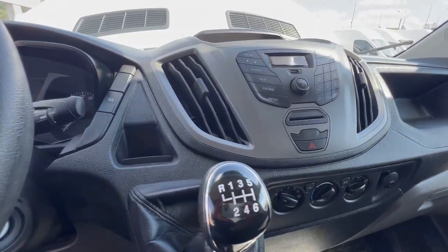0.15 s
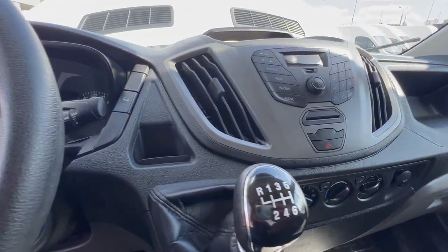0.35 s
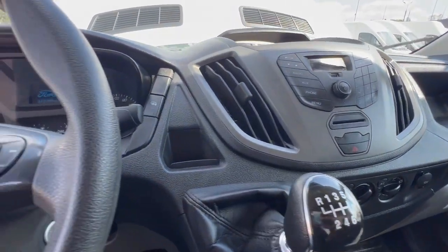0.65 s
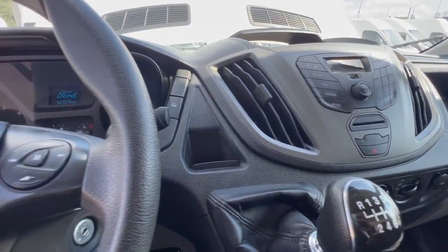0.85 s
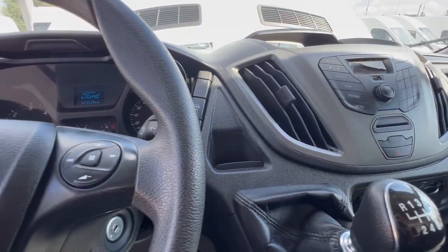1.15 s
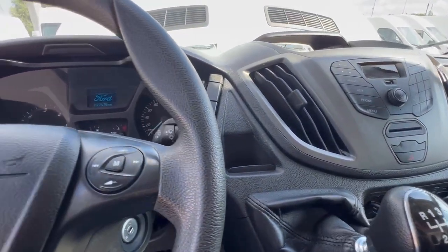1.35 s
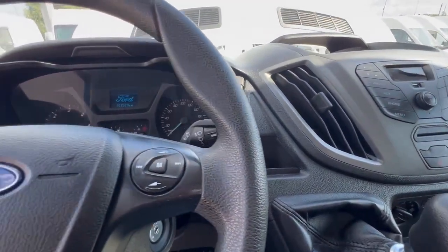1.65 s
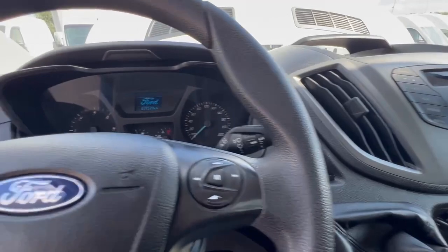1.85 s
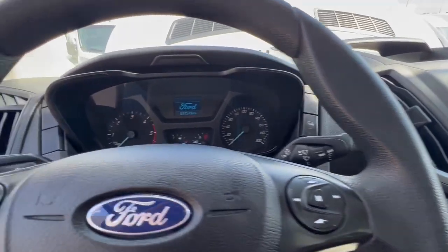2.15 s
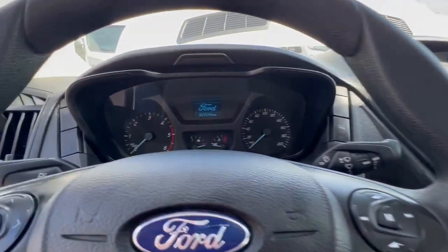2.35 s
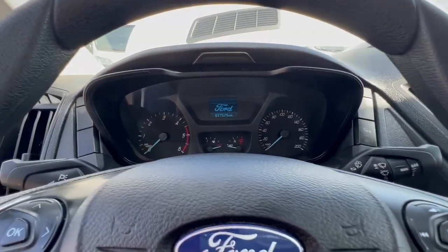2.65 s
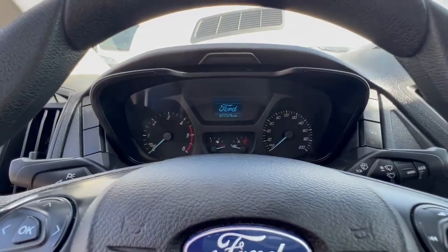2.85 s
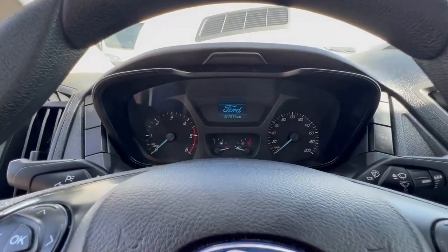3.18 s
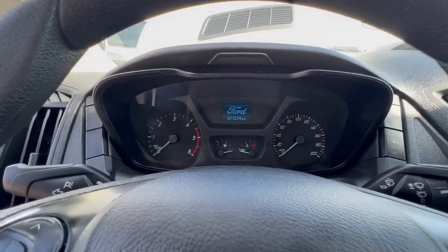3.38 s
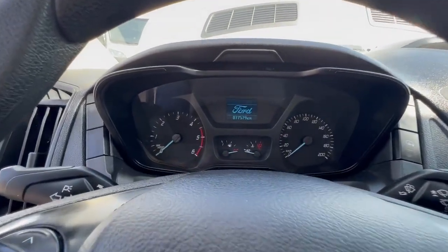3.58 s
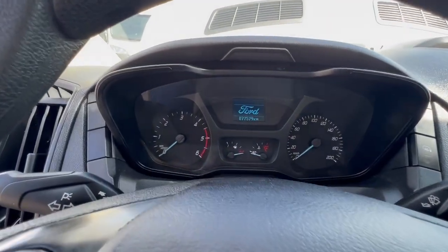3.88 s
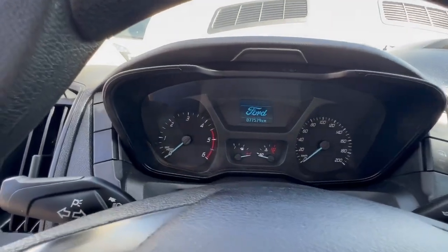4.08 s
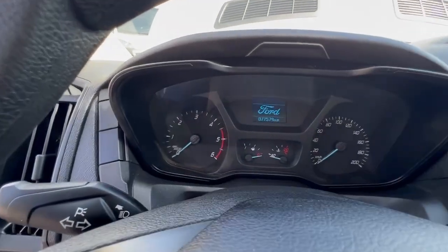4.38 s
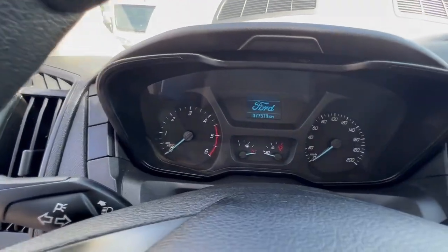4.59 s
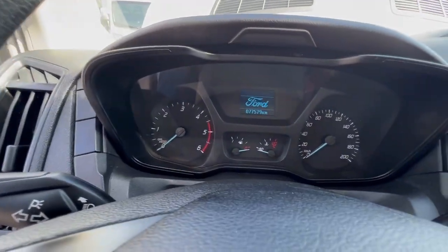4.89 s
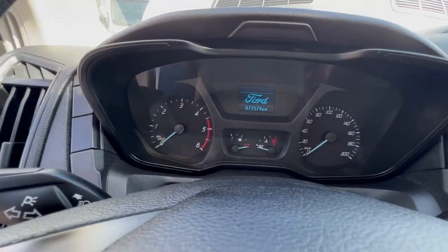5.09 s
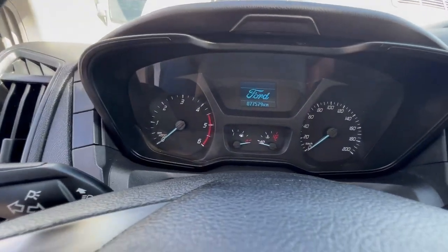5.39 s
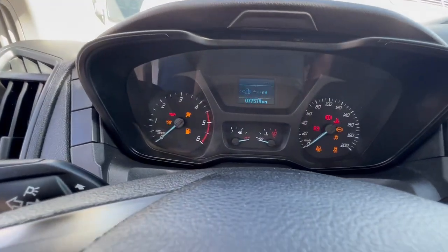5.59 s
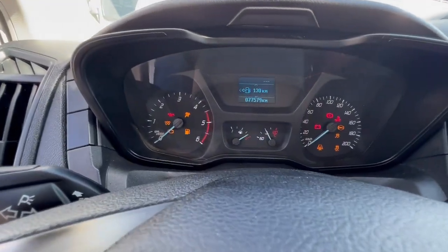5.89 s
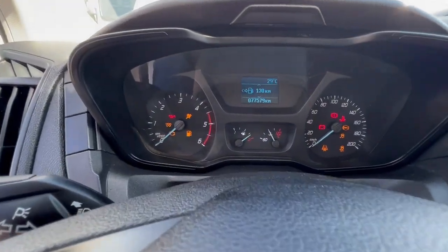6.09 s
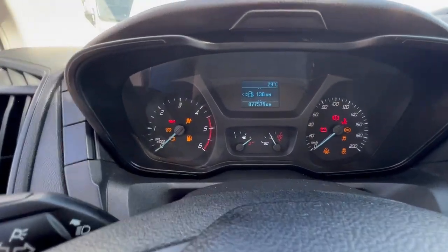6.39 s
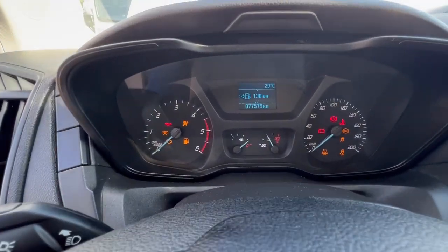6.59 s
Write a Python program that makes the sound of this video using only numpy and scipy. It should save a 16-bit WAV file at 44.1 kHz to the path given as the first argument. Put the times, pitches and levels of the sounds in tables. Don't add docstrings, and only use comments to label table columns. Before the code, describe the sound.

Inside a parked van, a hand-held phone gets knocked, then cloth rustles and a key scrapes, clicks and turns in the lock over low rumble.

```python
import sys
import numpy as np
from scipy import signal
from scipy.fft import rfft, irfft, next_fast_len
from scipy.io import wavfile
from scipy.ndimage import uniform_filter1d, map_coordinates

SR = 44100
rng = np.random.default_rng(int(sys.argv[2]) if len(sys.argv) > 2 else 0)


def volts_from_decibels(level):
    exponent = np.asarray(level, float) / 20
    return 10 ** exponent


def digitize_waveform(pressure):
    field = np.atleast_2d(pressure).T
    bounded = np.clip(field, -1, 1)
    quanta = np.round(bounded * 32767).astype(np.int16)
    wavfile.write(sys.argv[1], SR, quanta)


N = 297145
BURST = 8192

# time in seconds, rumble level in dB.
TRAFFIC = [(0, -54), (.3, -50), (.55, -58), (1.55, -52), (1.72, -71), (2.05, -65), (2.14, -56), (3.1, -59),
           (3.3, -51), (3.55, -58), (3.75, -50), (4.5, -53), (5.5, -47.5), (5.8, -56), (6.0, -50),
           (6.74, -49)]
# time in seconds, drone level in dB.
IDLER = [(0, -68), (1.3, -59), (1.65, -67), (2.08, -62), (2.22, -51), (2.5, -54), (2.63, -63), (2.74, -45),
         (2.93, -53), (3.15, -46), (3.4, -54), (3.7, -49.5), (5.03, -52), (5.2, -47), (5.7, -54),
         (6.22, -58), (6.5, -42), (6.74, -55)]
# frequency in Hz, width in Hz, level in dB.
BOOM_MODES = [(52.2, 24.5, -12), (35.2, 6.7, -33)]
# frequency in Hz, width in Hz, level in dB.
DRONE_MODES = [(91.1, 9.4, 2.5), (126, 45, -13.5)]
# frequency in Hz, density in dB per Hz.
AIR_SPECTRUM = [(120, -6), (145, -7), (373, -21), (565, -18.5), (658, -21.5), (723, -16.5), (942, -12.5),
                (1320, -17), (1790, -12), (2400, -20), (3040, -32), (3670, -34.5), (5260, -46.5),
                (7120, -39.5), (11000, -51)]
# frequency in Hz, left-right difference in dB.
AIR_BALANCE = [(60, 6), (110, 5.5), (190, -1.0), (350, -2.5), (620, -4.5), (1110, 3.5), (1990, 13),
               (3560, -0.5), (6370, 19), (11400, -17)]
# frequency in Hz, likeness from 0 to 1, left lead in radians.
PORTS = [(50, 0.91, .1), (170, 0.94, .2), (346, 0.4, 0.9), (527, 0.2, 1.7), (792, 0.3, 1.74),
         (1030, 0.7, 4.73), (1500, 0.5, 3.86), (1850, .6, 0.54), (2380, 0, 1.1), (9500, 0.21, 2.8)]

# start in seconds, peak in dB, pitch in Hz, T60 in seconds.
THUMPS = [
    (6.248, -35.5, 146, 0.34),
    (6.398, -44.5, 158, 0.25),
    (6.49, -40.5, 155, 0.27),
]

# start in seconds, length in seconds, level in dB.
RUSTLES = [(.39, .09, -72), (.903, .012, -62), (1.302, .015, -61), (1.445, .055, -65), (3.99, .09, -64),
           (4.187, .012, -56), (2.03, .56, -70.5), (2.7, .16, -62.5), (3.03, .45, -71.5),
           (3.62, .25, -60.5), (3.91, .05, -57.5), (4.22, .14, -57.5), (4.71, .15, -75), (5.04, .09, -57),
           (5.16, .07, -54.5), (5.29, .03, -55), (5.5, .045, -66), (5.7, .07, -71), (6.22, .04, -71),
           (6.42, .05, -72)]
# frequency in Hz, density in dB per Hz.
RUSTLE_SPECTRUM = [(1180, -51), (2000, -2), (2920, -1), (3390, -2.5), (5890, -7), (7650, -8), (8300, -7),
                   (9780, -9.5), (10500, -22), (11900, -44)]
# frequency in Hz, left-right difference in dB.
RUSTLE_BALANCE = [(2000, 0.5), (6500, 2.5), (8000, 0), (9500, -8)]
# start in seconds, length in seconds, level in dB.
SCUFFS = [
    (4.69, .01, -50),
    (5.0, .12, -41),
    (5.228, .01, -37),
    (5.312, .01, -41),
    (5.39, .025, -31),
    (6.21, .05, -49),
    (6.4, .04, -47),
]
# frequency in Hz, density in dB per Hz.
SCUFF_SPECTRUM = [(120, 2), (250, 3), (500, 0), (1000, -11.5), (2000, -32.5)]
# time in seconds, level in dB.
GRIP = [(0, -65), (.35, -60), (1.62, -60), (1.85, -76), (2.2, -75), (2.55, -71), (2.75, -60), (5.45, -55),
        (6.74, -54.5)]
RUSTLE_FLOOR_DB, RUSTLE_RISE_DB_PER_S, RUSTLE_FALL_DB_PER_S = -82, 450, 300

# start in seconds, length in seconds, level in dB.
SLIDES = [
    (.28, .035, -51),
    (.4, .07, -45),
    (.905, .02, -47),
    (1.29, .012, -44),
    (1.32, .04, -54),
    (1.375, .02, -48),
    (1.445, .01, -48),
    (1.495, .03, -55),
]
# start in seconds, peak in dB, tick and thud in dB re the peak,
# pitch of the air pocket in Hz.
KNOCKS = [(.382, -49, -18, -2, 1850), (.4033, -32, -27, -13, 1900), (.524, -50.5, 14, -4, 1400),
          (.8972, -16, -19, -13, 1960), (.9345, -32, -26, -6, 1760), (1.2867, -48, 9, -11, 1800),
          (1.2905, -37, -27, -12, 1720), (1.298, -34, -23, -7, 1720), (1.3025, -31.5, 6.5, -6, 1900),
          (1.3112, -16, -17, -7, 1790), (1.324, -44, -3, -4, 1760), (1.376, -40, -20, -8, 1660),
          (1.385, -38, -20, -9, 1640), (1.4642, -23, -24, -6.5, 1500), (1.466, -25, -10.5, -11, 1190),
          (1.468, -21, -12, -11, 1800), (1.4698, -27, -25, -9, 2120), (1.4936, -25, -20, -13, 1120),
          (1.496, -18.5, -18, -13, 1850), (1.511, -40, -25, -5, 2040), (3.649, -42, -24, -12, 1230)]
# frequency in Hz, width in Hz, level in dB.
PORT_MODES = [(1850, 444, 1.5), (1020, 270, -4)]
# frequency in Hz, width in Hz, level in dB.
THUD_MODES = [(190, 110, -17), (580, 177, 5), (95, 46, -2.5), (894, 240, -1)]

# start in seconds, peak in dB,
# frequency in Hz, length in seconds, left-right difference in dB.
CASE_RINGS = [(.363, -46, 1900, .004, 15), (.39, -50, 1450, .005, 15), (.435, -51, 1050, .008, 16),
              (.448, -50, 1850, .006, 16), (.468, -49, 1850, .008, 17), (.8995, -29, 430, .004, 7),
              (.935, -44, 1050, .004, 17), (1.446, -45, 1550, .004, 16), (1.465, -26, 580, .005, 11),
              (1.499, -41, 620, .009, 10), (1.523, -49, 1900, .005, 15), (1.328, -43, 620, .004, 10),
              (1.343, -46, 600, .003, 10), (3.643, -40, 1220, .009, 5), (3.643, -44, 820, .008, -8),
              (3.678, -54, 900, .018, 0)]
# start in seconds, peak in dB, frequency in Hz, length in seconds, left-right difference in dB.
KEY_AND_GRIP_RINGS = [(3.992, -45, 4100, .0015, 0), (4.007, -56, 11300, .001, 0), (4.095, -41, 11300, .0015, 0),
                      (4.096, -48, 2030, .005, 0), (4.098, -47, 1450, .006, 3), (4.199, -32, 4300, .001, -3),
                      (5.054, -43, 1600, .007, -6), (5.056, -41, 620, .007, -6), (5.083, -38, 2020, .005, 0),
                      (5.085, -37, 1410, .007, 0), (5.094, -39, 813, .008, -2), (5.088, -39, 250, .012, -4),
                      (5.119, -38, 160, .012, 0), (5.211, -34, 1940, .004, 0), (5.221, -39, 1940, .004, -10),
                      (5.221, -41, 900, .01, 0), (5.219, -32, 458, .01, -8), (5.229, -33, 285, .009, -12),
                      (5.241, -34, 285, .008, -5), (5.291, -47, 1950, .005, 5), (5.291, -44, 450, .006, -2),
                      (5.308, -38, 1080, .006, -13), (5.309, -25, 3350, .002, -9), (5.311, -39, 474, .014, -10),
                      (5.322, -52, 1300, .012, 0), (5.381, -32, 1920, .009, 0), (5.38, -33, 550, .006, 3),
                      (5.384, -35, 780, .016, -10), (5.383, -30, 2980, .011, -8), (5.386, -35, 3610, .008, 0),
                      (5.394, -30, 490, .007, -5), (5.396, -30.5, 190, .011, -4), (5.415, -47, 1520, .014, 2),
                      (5.455, -48, 1900, .006, 0), (5.377, -38, 11500, .002, 0), (6.233, -50, 330, .012, -14),
                      (6.403, -48, 450, .012, -15), (6.105, -52, 500, .012, -10),
                      (.902, -37, 240, .01, 5), (.938, -46, 300, .008, 5), (1.474, -38, 180, .016, 3),
              (3.69, -52, 1000, .012, 0), (3.748, -47, 2400, .0015, 3), (4.216, -40, 4300, .001, -3),
              (4.999, -45, 600, .01, -5), (5.022, -45, 1080, .009, -5), (5.032, -42, 450, .009, -5),
              (5.125, -45, 500, .008, -5), (5.14, -38, 140, .014, 0), (5.17, -45, 400, .012, -5),
              (5.211, -40, 1050, .006, -8), (5.226, -36, 1050, .012, -8), (5.255, -36, 130, .01, 0),
              (5.396, -31, 145, .014, -3), (5.4, -39, 2890, .025, -3), (5.418, -42, 845, .014, -6),
              (5.425, -40, 500, .012, -6), (.5247, -42, 3300, .0006, 3), (1.304, -40, 1380, .003, 18),
              (1.3145, -29, 580, .004, 10), (1.494, -45, 8600, .003, 5), (1.465, -42, 9000, .004, 5),
              (4.007, -50, 3000, .001, 0), (4.2, -38, 4300, .011, -3), (4.198, -44, 6000, .008, 0),
              (5.086, -44, 2900, .01, 6), (5.096, -37, 600, .007, -8), (5.212, -41, 3400, .014, -6),
              (5.425, -35, 200, .006, 5), (5.293, -47, 3300, .003, 0)]
# start in seconds, peak in dB,
# frequency in Hz, length in seconds.
SHAKES = [
    (1.307, -30, 340, .005),
    (1.466, -26, 340, .005),
    (1.482, -31, 200, .008),
    (5.085, -38, 1720, .004),
    (5.375, -32, 800, .005),
    (5.381, -30, 1610, .006),
    (5.381, -38, 2640, .004),
    (5.384, -28, 11030, .011),
]

# start in seconds, peak in dB, lock body in dB re the peak,
# brightest pitch in Hz, left-right difference in dB.
KEYS = [(2.7485, -43, 1, 6100, 5), (3.6345, -44.5, 3, 5640, 2), (3.747, -43.5, -5, 5600, 4),
        (3.995, -49, -7, 4080, -1.5), (4.0127, -42, -12, 5030, 0), (4.094, -29, -6, 3600, 0),
        (4.184, -50, -4, 3830, 7), (4.199, -32, -8.5, 4330, -3), (4.447, -57, -17, 3240, -7),
        (4.6766, -38, -5, 2930, 2), (4.7692, -36.5, -4.5, 7850, -3), (4.813, -52.5, -9, 4720, -3),
        (4.8813, -51.5, 6.5, 8900, -7), (4.9621, -50, -16, 2960, -12), (4.998, -49, 10, 8240, -5),
        (5.0484, -32, -8, 4230, 1), (5.212, -35, -10, 3390, -13), (5.274, -39.5, 1, 6410, -5),
        (5.3075, -24, -6, 3320, -1), (5.4895, -46.5, 7, 5030, -2), (5.457, -54, 14, 3320, -2),
        (5.5358, -34.5, -2.5, 9180, -4), (5.7125, -44, -6, 9300, -5.5)]
# start in seconds, peak in dB, lock body in dB re the peak,
# brightest pitch in Hz, length in seconds.
RATTLES = [(2.466, -49, -7, 3940, .01), (3.668, -47, 1.5, 2950, .015), (3.8294, -47, -7, 7860, .012),
           (4.1024, -37, -24, 4250, .0062), (4.1984, -33, -19, 4330, .012), (4.2146, -31, -17, 4380, .0074),
           (5.0207, -46, 10, 3250, .015), (5.0544, -36, 5.5, 4150, .018), (5.0819, -31, -3, 4270, .0082),
           (5.1467, -43, 1, 4410, .021), (5.1944, -40, -2, 3660, .014), (5.2197, -35, -2, 3300, .0072),
           (5.311, -33.5, -3, 3550, .01), (5.3775, -19, -12, 3050, .0093), (5.386, -21, -9, 6380, .0062),
           (5.3994, -26, -6.5, 6490, .01), (5.4194, -33, -3, 3200, .0077), (5.892, -55.5, -1, 4800, .018),
           (6.098, -52, 7.5, 4240, .015), (6.208, -54, 7.5, 4940, .012), (6.3933, -62, 15.5, 3340, .01),
           (6.433, -57.5, 11, 3650, .024)]
# frequency in Hz, width in Hz, level in dB.
KEY_MODES = [(2843, 55, 6), (3250, 42, 0.5), (3580, 91, -4), (4147, 70, 4.5), (4323, 44, 0), (4560, 72, -2),
             (5043, 106, -7), (5640, 150, 1), (6405, 90, -4.5), (6630, 86, -4.5), (8240, 150, -10),
             (8800, 100, -12.5), (9390, 93, 1), (11500, 200, -7)]
# frequency in Hz, width in Hz, level in dB.
LOCK_MODES = [(202, 130, -1.5), (269, 29, -1.5), (455, 57, 1), (586, 58, 1.5), (810, 64, 3),
              (1134, 77, 1.5), (1400, 87, -2.5), (1600, 62, -3.5), (1900, 143, 1), (2440, 320, -4.5),
              (2777, 220, -11)]
# frequency in Hz, width in Hz, level in dB.
NOTCHES = [(3075, 470, -3), (5330, 120, -7), (7680, 200, -16)]


def in_time(rows):
    seconds, level = np.transpose(rows)
    return np.interp(np.arange(N) / SR, seconds, level)


def at_hz(points, hz, column=1):
    points = np.array(points)
    return np.interp(np.log(hz + 1), np.log(points[:, 0]), points[:, column])


def bins(size):
    return np.arange(size // 2 + 1) * SR / size


def rms_one(x):
    return x / np.sqrt(np.mean(x ** 2) + 1e-20)


def per_blow(values):
    return values[:, None, None]


def resonances(modes, hz, scatter_db=0):
    centre, width, level_db = np.transpose(modes)
    damping = 1j * hz * width[:, None]
    each = damping / (centre[:, None] ** 2 - hz ** 2 + damping)
    return (volts_from_decibels(level_db + scatter_db) * (-1) ** np.arange(len(centre))) @ each


def drift(rate):
    steps = rng.standard_normal(2000)
    return map_coordinates(steps, [np.arange(N) * rate / SR + 5], order=3)


def grains(shape, per_s, spread_db):
    born = rng.random(shape) < per_s / SR
    size_db = spread_db * np.minimum(rng.exponential(1, shape), 4)
    return born * volts_from_decibels(size_db) * rng.choice([-1, 1], shape)


def strokes(rows, rise_db_per_s, fall_db_per_s):
    t = np.arange(0, N, 32) / SR
    start, length, db = np.transpose(rows)[:, :, None]
    db = db - rise_db_per_s * np.maximum(start - t, 0)
    db = db - fall_db_per_s * np.maximum(t - start - length, 0)
    gain = np.sqrt(np.sum(volts_from_decibels(np.maximum(db, -200)) ** 2, axis=0))
    return np.interp(np.arange(N) / SR, t, gain)


def at_ports(first, other, response, balance_db):
    size = next_fast_len(N)
    hz = bins(size)
    alike = np.clip(at_hz(PORTS, hz), 0, 1)
    left = rfft(first, size)
    shared = alike * left * np.exp(-1j * at_hz(PORTS, hz, column=2))
    right = shared + np.sqrt(1 - alike ** 2) * rfft(other, size)
    gains = response * volts_from_decibels(balance_db * [[.5], [-.5]])
    return rms_one(irfft(gains * [left, right], size)[:, :N])


def strike(contacts, response):
    fade = np.minimum(np.linspace(4, 0, BURST), 1) ** 4
    rows = irfft(rfft(contacts) * response) * fade
    return rows / np.abs(rows).max(axis=-1, keepdims=True)


def chatter(length_s, per_s, spread_db, tail, own, lag_s):
    t = np.arange(BURST) / SR
    length = per_blow(np.clip(length_s, .0003, .06))
    hits = grains((len(length), 2, BURST), per_s, spread_db)
    hits[:, 0, 0] = 2.7
    hits[:, 1] = own * hits[:, 1] + hits[:, 0]
    hits = hits * np.exp(-np.maximum(t - length, 0) / (tail * length + 0.0012))
    hits[:, 0] = np.roll(hits[:, 0], round(lag_s * SR), axis=-1)
    return hits


def jolts(hits, pitch=1):
    return strike(hits[:, :1], resonances([(100, 70, 0)], bins(BURST) / pitch) ** 2) * [[1], [-1]]


def place(times, rows, pan_db):
    out = np.zeros((2, N + BURST))
    for s, row, db in zip(times, rows, pan_db):
        start = round(s * SR)
        out[:, start:start + BURST] += row * volts_from_decibels(np.array([[db], [-db]]) / 2)
    return out[:, :N]


def cab_noise():
    air_db, air_follows, lull_db = -55.5, .55, -65
    air_db = air_db + air_follows * np.minimum(in_time(GRIP) - lull_db, 0)
    air_db = air_db + 3 + 0.51 * drift(9)
    hz = bins(next_fast_len(N))
    white = rng.standard_normal((3, 2, N))
    boom_response = resonances(BOOM_MODES, hz) / (1 + (hz / 80) ** 4)
    drone_response = resonances(DRONE_MODES, hz) / (1 + (hz / 170) ** 4)
    air_response = volts_from_decibels(at_hz(AIR_SPECTRUM, hz)) / (1 + (110 / (hz + 1)) ** 6)
    boom = at_ports(*white[0], boom_response, -1.5 + 0 * hz)
    drone = at_ports(*white[1], drone_response, 0.5 + 0 * hz)
    air = at_ports(*white[2], air_response, at_hz(AIR_BALANCE, hz))
    return volts_from_decibels(in_time(TRAFFIC) + 5.5) * boom + volts_from_decibels(in_time(IDLER) + 2) * drone + volts_from_decibels(air_db) * air


def cab_echo(x):
    t60_s = 0.089
    t = np.arange(SR // 5) / SR
    tail = rng.standard_normal((2, len(t))) * volts_from_decibels(-60 * t / t60_s) * (t > .002)
    tail = tail / np.sqrt(np.sum(tail ** 2, axis=1, keepdims=True))
    return signal.fftconvolve(x, tail, axes=1)[:, :N]


def thumps():
    t = np.arange(BURST) / SR
    s, peak_db, hz, t60 = np.transpose(THUMPS)[:, :, None]
    swell = 1 - np.exp(-t / 0.023)
    ring = np.sin(2 * np.pi * hz * (t - 1.13 * t ** 2)) * swell * volts_from_decibels(peak_db + 7 - 60 * t / t60)
    ring = ring * np.cos(np.pi / 2 * t / t[-1])
    return place(s[:, 0], ring[:, None], 0 * s[:, 0])


def rubbing():
    rustle_level = strokes(RUSTLES, RUSTLE_RISE_DB_PER_S, RUSTLE_FALL_DB_PER_S)
    rustle_level = np.hypot(rustle_level, volts_from_decibels(RUSTLE_FLOOR_DB))
    scuff_level = strokes(SCUFFS, rise_db_per_s=1400, fall_db_per_s=400)
    scuff_level = np.hypot(scuff_level, volts_from_decibels(in_time(GRIP)))
    size = next_fast_len(N)
    hz = bins(size)
    clumps_db = 2.5 * drift(30)
    bright = volts_from_decibels(at_hz(RUSTLE_SPECTRUM, hz)) / (1 + (1700 / (hz + 1)) ** 4)
    rustle = at_ports(*grains((2, N), 3500., 2.4), bright, at_hz(RUSTLE_BALANCE, hz))
    dull = volts_from_decibels(at_hz(SCUFF_SPECTRUM, hz)) / (1 + (110 / (hz + 1)) ** 6)
    near, own = rfft(grains((2, N), 900., 2.7), size) * dull
    late = near * np.exp(-2j * np.pi * hz * 0.000826)
    scuff = rms_one(irfft([0.51 * late + 0.51 * own, near], size)[:, :N])
    return rustle_level * volts_from_decibels(4.5 + clumps_db) * rustle + scuff_level * volts_from_decibels(1.12 * drift(20)) * scuff


def sheen():
    band = signal.butter(8, [9700, 11500], "band", fs=SR, output="sos")
    level = strokes(RUSTLES, RUSTLE_RISE_DB_PER_S, RUSTLE_FALL_DB_PER_S)
    noise = rms_one(signal.sosfilt(band, rng.standard_normal(N)))
    return volts_from_decibels(-12) * level * noise * np.array([[1], [-1]])


def slides():
    size = next_fast_len(N)
    hz = bins(size)
    level = strokes(SLIDES, rise_db_per_s=1000, fall_db_per_s=500)
    pocket = resonances(PORT_MODES, hz) / (1 + (hz / 2700) ** 4)
    skin = resonances([(3780, 2800, 2.5), (6970, 3000, -18.5)], hz) / (1 + (hz / 8000) ** 10)
    colour = pocket + volts_from_decibels(-21.5) * skin
    creep = irfft(rfft(grains((2, N), 2500., 3.7), size) * colour)[:, :N]
    return level * volts_from_decibels(2.5 * drift(60)) * rms_one(creep) * volts_from_decibels(np.array([[3.], [-9.]]))


def knocks():
    s, peak_db, tick_db, thud_db, pocket_hz = np.transpose(KNOCKS)
    length_s = .001 + .00001 * (-15 - peak_db)
    hz = bins(BURST)
    hits = chatter(length_s, 1200., 1.5, tail=0.27, own=1.0, lag_s=.0004)
    pocket = [resonances(PORT_MODES, hz * PORT_MODES[0][0] / f) ** 2 for f in pocket_hz]
    pop = strike(hits, np.array(pocket)[:, None])
    tick_response = resonances([(3970, 1200, 21), (6540, 2200, -7.5), (8500, 1400, 2.5)], hz)
    tick_response = tick_response * 1j * hz / (1j * hz + 2500) / (1 + (hz / 9700) ** 16)
    tick = strike(hits, tick_response)
    delay = np.exp(-2j * np.pi * hz * .0015)
    thud = strike(hits, resonances(THUD_MODES, hz) / (1 + 1j * hz / 700) * delay)
    thud = thud * [[1], [-2.5]]
    rows = pop + per_blow(volts_from_decibels(tick_db)) * tick + per_blow(volts_from_decibels(thud_db)) * thud
    rows = per_blow(volts_from_decibels(peak_db)) * rows
    jolt = per_blow(volts_from_decibels(peak_db - 9)) * jolts(hits, pitch=1.15)
    return place(s, 1.34 * rows, 17 + 0 * s) + place(s, jolt, 0 * s)


def rings():
    rise, tail, flutter_db, lag_s = .3, .35, 2.5, .00051
    rows = CASE_RINGS + KEY_AND_GRIP_RINGS + [(*row, 0) for row in SHAKES]
    s, peak_db, hz, length, pan_db = np.transpose(rows)[:, :, None, None]
    shaken = per_blow(np.arange(len(s)) >= len(s) - len(SHAKES))
    t = np.arange(BURST // 4) / SR - np.array([[lag_s], [0]]) * ~shaken
    swell = np.clip(t / (rise * length), 0, 1)
    decay = np.exp(-(np.maximum(t - length, 0) / (tail * length + 1 / hz)) ** 2)
    turn, beat = 2 * np.pi * np.transpose(rng.random((len(s), 2)))[:, :, None, None]
    flutter = flutter_db * np.sin(2 * np.pi * t / (.6 * length) + beat)
    tone = np.sin(2 * np.pi * hz * t + turn) * np.where(shaken, [[1], [-1]], 1)
    blows = volts_from_decibels(peak_db + flutter) * swell * decay * tone
    blows = np.pad(blows, ((0, 0), (0, 0), (0, BURST - BURST // 4)))
    return place(s.ravel(), blows, pan_db.ravel())


def keys():
    tick_s = .003
    rows = [(*row, tick_s, pan) for *row, pan in KEYS] + [(*row, -1.5) for row in RATTLES]
    s, peak_db, lock_db, bright_hz, length_s, pan_db = np.transpose(rows)
    hz = bins(BURST)
    hits = chatter(length_s, 7000., 3.56, tail=0.36, own=0.67, lag_s=.0006)
    scatter_db = rng.normal(0, 1, (len(s), 2, len(KEY_MODES))) * 4.1
    octaves = np.log2((hz + 1) / per_blow(bright_hz))
    emphasis = volts_from_decibels(-4.5) + np.exp(-(octaves / 0.26) ** 2)
    excess_s = per_blow(np.maximum(length_s - tick_s, 0))
    emphasis = emphasis / (1 + excess_s / 0.0037 * (hz / 10650) ** 16)
    crack = volts_from_decibels(-6.5) * (1j * hz / (1j * hz + 2500)) ** 2
    damped_modes = np.multiply(KEY_MODES, [1, 2.6, 1])
    metal = strike(hits, (resonances(damped_modes, hz, scatter_db) + crack) * emphasis)
    scatter_db = rng.normal(0, 1, (len(s), 2, len(LOCK_MODES))) * 4.8
    lock = strike(hits, resonances(LOCK_MODES, hz, scatter_db) / (1 + 1j * hz / 3200))
    body = per_blow(volts_from_decibels(lock_db)) * (lock + volts_from_decibels(-12) * jolts(hits))
    return place(s, 1.385 * per_blow(volts_from_decibels(peak_db)) * (metal + body), pan_db)


def scene():
    metal, grip = keys(), knocks()
    echo = cab_echo(volts_from_decibels(-11) * metal + volts_from_decibels(-17) * grip)
    return metal + grip + echo + slides() + thumps() + rubbing() + cab_noise() + rings()


def patchy_bands(x, margin_db, faint_db):
    frame, faint_hz = 1024, 9000
    hz, _, frames = signal.stft([x[0] + x[1], x[0] - x[1]], SR, nperseg=frame)
    band = np.floor(12 * np.log2(np.maximum(hz, 600) / 600)).astype(int)
    member = band == np.arange(band.max() + 1)[:, None]
    power = member / member.sum(axis=1, keepdims=True) @ np.abs(frames) ** 2
    power = uniform_filter1d(power, size=3)
    level_db = 10 * np.log10(power + 1e-20)
    level_db[:, 0] = level_db[:, 1]
    wander = uniform_filter1d(rng.standard_normal(power.shape), size=6)
    margin_db = margin_db + 6.5 * wander
    above_db = (level_db - uniform_filter1d(level_db, size=5, axis=1) + margin_db)[:, band]
    above_db = above_db + 3.4 * np.clip(1 - hz / 2800, .0, 1)[:, None] ** 2 + 30 * (band == 0)[:, None]
    above_faint_db = level_db[:, band] - faint_db - 5.5 * (hz[:, None] - faint_hz) / 1000
    above_db = np.where(hz[:, None] > faint_hz, above_faint_db, above_db)
    treble = frames[:, (hz > 2500) & (hz < faint_hz)]
    treble_db = 10 * np.log10(np.sum(np.abs(treble) ** 2, axis=(0, 1)) + 1e-20)
    jump_db = np.maximum(np.roll(treble_db, -1), treble_db) - np.roll(treble_db, shift=2)
    above_db = above_db + 1.4 * np.maximum(jump_db - 6.5, 0)
    kept = frames * (1 + np.tanh(2 * above_db)) / 2
    mid, side = signal.istft(kept, SR, nperseg=frame)[1][:, :N]
    return np.array([mid + side, mid - side]) / 2


def band_limit(x):
    return signal.sosfilt(signal.butter(12, 12020, fs=SR, output="sos"), x)


def record(dry):
    size = next_fast_len(N)
    hz = bins(size)
    response_db = sum(db * np.exp(-((hz - centre) / width) ** 2) for centre, width, db in NOTCHES)
    response_db = response_db - 10 / (1 + (10650 / (hz + 1)) ** 24)
    top_cut = 1 / (1 + (hz / 12100) ** 80)
    heard = irfft(rfft(dry, size) * volts_from_decibels(response_db) * top_cut, size)[:, :N]
    mix = patchy_bands(heard, margin_db=1.5, faint_db=-101) + sheen()
    return band_limit(mix)


dry = scene()
out = record(dry)
digitize_waveform(out)
```